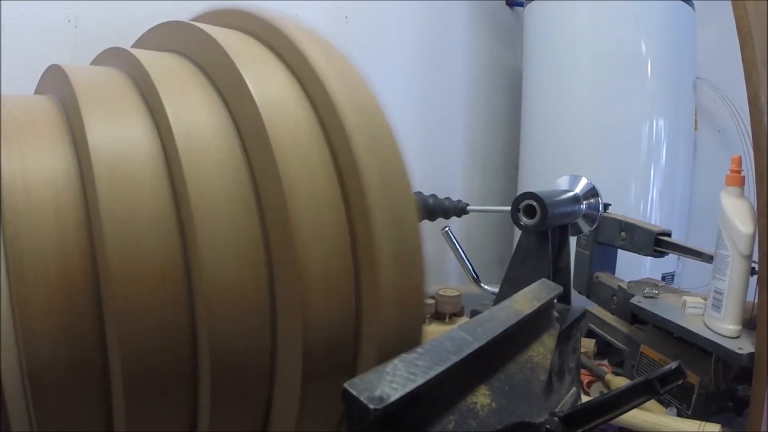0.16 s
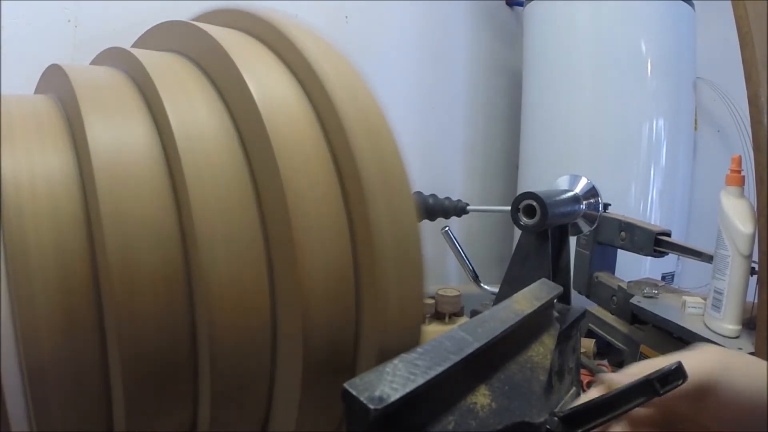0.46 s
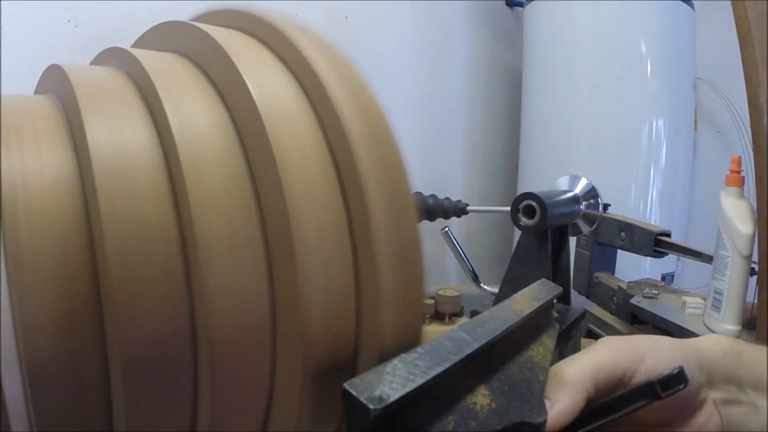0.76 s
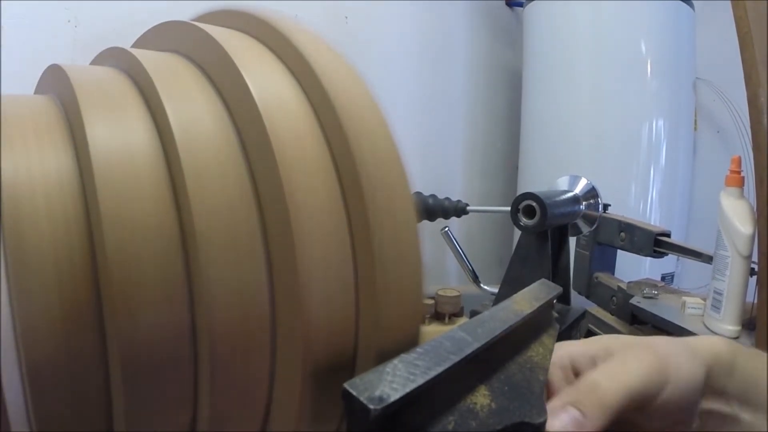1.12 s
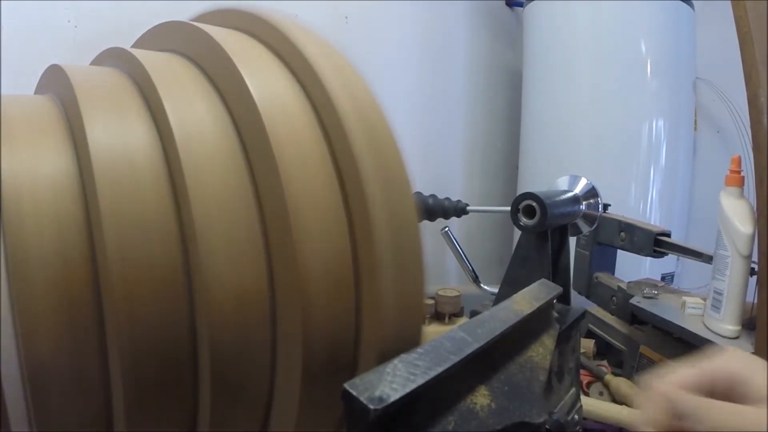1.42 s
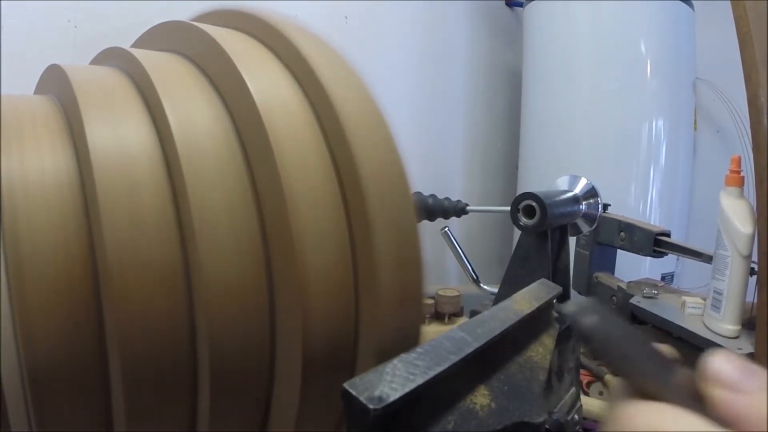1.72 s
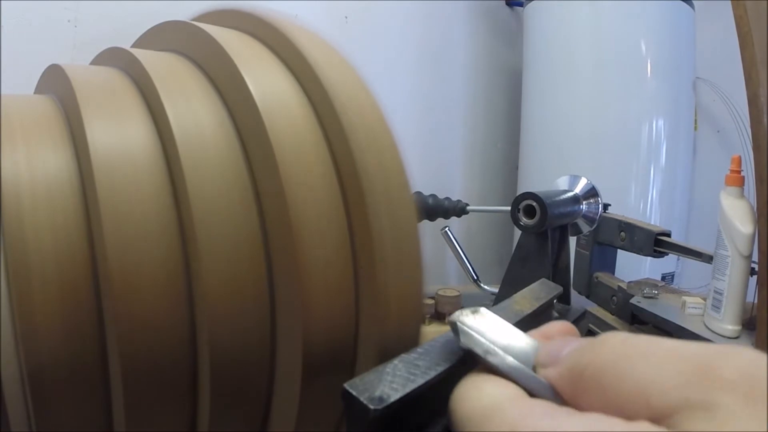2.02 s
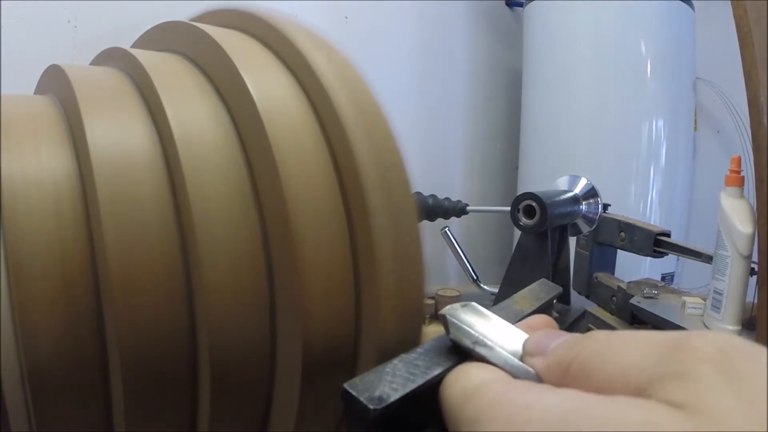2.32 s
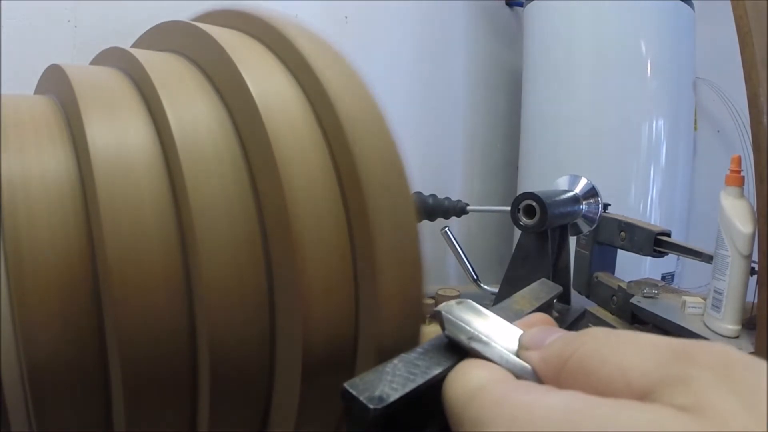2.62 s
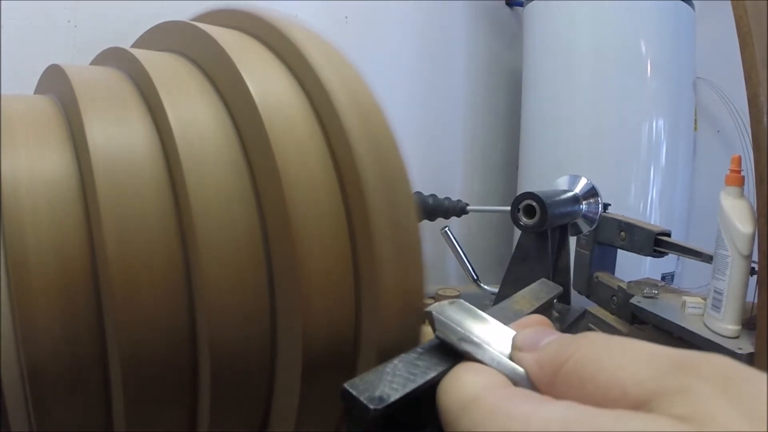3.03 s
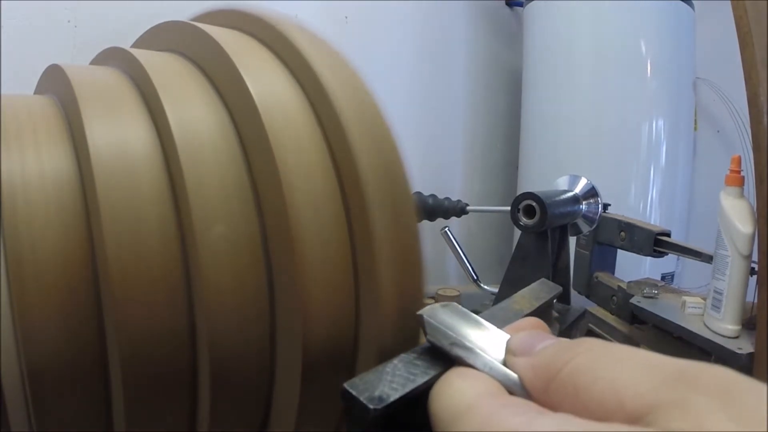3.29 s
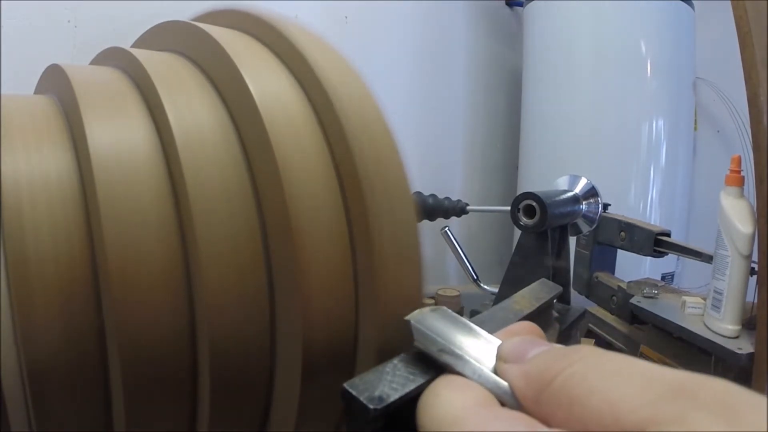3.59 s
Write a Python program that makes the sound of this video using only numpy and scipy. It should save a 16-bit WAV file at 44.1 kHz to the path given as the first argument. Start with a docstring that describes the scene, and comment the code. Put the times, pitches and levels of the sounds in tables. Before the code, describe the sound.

A wood lathe hums, steel clinks, then a gouge scrapes and chatters against spinning wood.

```python
"""A small workshop: a wood lathe growls up to speed, then hums, its belt and bearings whirring.
A steel tool is put down with a clink. A gouge taps the rest and meets the spinning blank:
first mainly its high side, once a turn, then all round. The edge scrapes nearly the same grain
every turn and chatters on its ripples, ringing gouge and rest; fibres hiss and chips snap off."""
import sys
import numpy as np
from scipy import signal
from scipy.fft import rfft, irfft
from scipy.io import wavfile

SR = 44100
rng = np.random.default_rng(int(sys.argv[2]) if len(sys.argv) > 2 else 0)


def log_audio(samples):
    """Write samples as a 16-bit WAV file to the path given in sys.argv[1]."""
    # one column per channel
    frames = np.atleast_2d(samples).T
    # limit to full scale, then quantise
    limited = np.clip(frames, -1, 1)
    pcm = np.round(limited * 32767).astype(np.int16)
    wavfile.write(sys.argv[1], SR, pcm)


N = 165375

# run-up, idle, slight sag under the cut (time [s], speed [turns/s])
MOTOR_SPEED = [(0, 18), (.1, 20.2), (.2, 23), (.3, 25.8), (.4, 28.4), (.48, 29.5), (.6, 29.73),
               (2.9, 29.73), (3.3, 29.55), (3.75, 29.45)]
# main hum, swelling and dipping (time [s], level [dB])
MOTOR_HUM = [(0, -42), (.12, -27), (.2, -23.5), (.3, -16.5), (.45, -15), (.58, -20), (.8, -15.5),
             (1.05, -15), (1.42, -20), (1.83, -15), (2.1, -17), (2.25, -20.5), (2.62, -15.5), (2.86, -17.5),
             (3.0, -16), (3.1, -27), (3.17, -16.5), (3.27, -16), (3.36, -22.5), (3.46, -14), (3.53, -13.5),
             (3.63, -28), (3.7, -17.5), (3.75, -16)]
# weaker motor vibration (multiple of turn rate [-], level [dB])
MOTOR_HARMONICS = [(3, -47), (5, -46), (6, -52.5), (7, -51.5), (8, -44), (9, -50), (10, -49.5), (20, -62.5),
                   (30, -59)]
# spindle shake (multiple of turn rate [-], idle level [dB], change under load [dB])
SPINDLE_HARMONICS = [(1, -38.5, -0.5), (2, -41, -2.5), (3, -46.5, 14), (5, -51.5, 9.5), (6, -52.5, 3)]
# mains hum, strong at the start (time [s], level [dB])
MAINS_HUM = [(0, -30), (.3, -21.5), (.42, -35.5), (3.75, -42.5)]
# starting motor (frequency [Hz], width [Hz], gain [dB])
GROWL_PEAKS = [(247, 51, 5), (584, 93, 3), (850, 72, -0.5), (1030, 130, -5.5), (1473, 140, -7.5),
               (2060, 180, -20)]
# rising whine (multiple of turn rate [-], level [dB])
WHINE_HARMONICS = [(13, -50.5), (31, -51.5), (52, -57), (78, -60.5), (102, -60.5)]
# frame resonances (frequency [Hz], width [Hz], gain [dB])
FRAME_PEAKS = [(161, 29, 1.5), (220, 28, -4), (267, 15, -3.5)]
# belt, bearings and air, upper and lower band (frequency [Hz], gain [dB])
WHIRR_SPECTRUM = [(260, -42), (440, -10.5), (467, -3), (542, -3), (611, -4), (730, -8.5), (913, -3.5),
                  (1190, -15.5), (1490, -13), (1630, -18.5), (2040, -15.5), (2270, -14.5), (3010, -17.5),
                  (3290, -18), (4500, -25.5), (6240, -28.5), (8670, -36), (11500, -36.5), (15500, -52)]
RUMBLE_SPECTRUM = [(15, -19), (40, -15.5), (70, -8), (100, 2), (135, 0), (175, -1.5), (215, -5.5),
                   (270, -9.5), (320, -16), (380, -20.5), (430, -29)]
# steady ring of the ironwork (frequency [Hz], width [Hz], gain [dB])
IRON_PEAKS = [(891, 8.3, 0.5), (2300, 30, -5.5), (3246, 20, -6), (3570, 20, -10), (4740, 23, -14.5),
              (6300, 38, -17), (7300, 60, -22.5)]
# steel put down (time [s], gain [dB])
STEEL_BLOWS = [(1.2344, -34.5), (1.3306, -3.5), (1.3765, -30)]
# its modes (frequency [Hz], gain [dB], t60 [s])
STEEL_MODES = [(1027, -23, 0.31), (1710, -32, 0.23), (3300, -15, 0.14), (3607, -18, .2), (4040, -17, 0.19),
               (4350, -13, 0.098), (4700, -5.5, .03), (4780, -10.5, 0.17), (4780, 3, 0.047),
               (6430, -18.5, .18), (6430, -17, 0.098), (14200, -19, .07)]
# its crack (frequency [Hz], gain [dB])
CRACK_SPECTRUM = [(600, -25), (1100, -8.5), (2200, -8), (3200, -3), (4800, 4.5), (5600, -11), (6500, -5.5),
                  (8200, -21.5), (11000, -17.5), (14000, -24), (15200, -33.5)]
# gouge touching the rest (time [s], gain [dB])
REST_BLOWS = [(2.2463, -46.5), (2.256, -48.5)]
# modes of that tap (frequency [Hz], gain [dB], t60 [s])
REST_MODES = [(2338, -4, 0.14), (3330, -4, 0.08), (4400, -11, 0.12), (4340, -6, .07), (6250, -11.5, .06)]
# edge on the wood (time [s], high-side force [dB], drop on the low side [dB])
CUT_FORCE = [(2.76, -60, 36), (2.772, -18, 22), (2.795, -28, 24), (2.802, -4.5, 24), (2.85, -5.5, 16.5),
             (2.92, -6.5, 16), (2.97, -5, 10), (3.03, 0.5, 10), (3.12, -1, 7.7), (3.3, -0.5, 6.2),
             (3.37, 2.5, 12.5), (3.46, -2, 7.5), (3.52, 3.5, 9.6), (3.61, 2, 10.5), (3.75, -1, 6.3)]
# gouge and rest resonances (frequency [Hz], width [Hz], gain [dB])
GOUGE_PEAKS = [(673.7, 30, -14), (1052, 55, -9), (1486, 115, -12), (2183, 83, -29.5), (2769, 76, -6.5),
               (3160, 73, -12), (3386, 190, -6.5), (3454, 70, 4.5), (3555, 72, 1), (4180, 70, -11),
               (4420, 134, -5.5), (4840, 44, -7.5), (5555, 52, -9), (5796, 84, 0.5), (6158, 95, 2.5),
               (6170, 150, -26)]
# drone of the blank, ripple harmonics 1-3 (level at full force [dB])
BLANK_DRONE_DB = [-47.5, -53.5, -50]
# tearing fibres (frequency [Hz], gain [dB])
FIBRE_SPECTRUM = [(300, -10), (600, -12.5), (1200, -13.5), (1500, -4.5), (1750, -5), (2300, -4.5),
                  (3400, 0.5), (4400, 0), (5200, -5), (6200, 3.5), (6800, -12), (7600, -12), (10000, -17),
                  (13000, -24), (15500, -36.5)]
# brief dips in the hiss (time [s], length [s], gain [dB])
HISS_DIPS = [(2.973, 0.0052, -13), (3.084, 0.02, -14), (3.187, 0.049, -52), (3.359, 0.031, -11)]
# chips snapping off (time [s], level [dB])
CHIP_SNAPS = [(2.983, -32), (3.121, -37), (3.283, -36)]
# their colour (frequency [Hz], gain [dB])
CHIP_SPECTRUM = [(3000, -4), (6000, 0), (9000, 2), (14000, -1), (15500, -10)]

MAINS_HUM_HZ, BELT_RATIO = 120, 0.968
GROWL_END_S, GROWL_FADE_S, SHUDDER_PEAK_S, SHUDDER_WIDTH_S = 0.32, 0.28, 0.34, 0.16
FIRST_BITE_S, BLANK_TURN_HZ, RIPPLES_PER_TURN, RIPPLE_DEPTH = 2.802, 28.65, 12, 0.45
BITE_TURNS, HIGH_SIDE_TURNS, RELEASE_TURNS = 0.022, 0.28, 0.29
GRAIN_MEMORY, GRAIN_SPREAD_DB, HAND_WAVER_DB = 0.6, 6.5, 0.5
ROOM_DELAY_S, ROOM_T60_S, ROOM_DB = 0.0048, 0.067, -22.5
TOP_HZ = 15450


def undb(db):
    """Decibels to gain."""
    return 10 ** (np.asarray(db) / 20)


def level(x, db):
    """Scale to an rms level."""
    return x * undb(db) / np.sqrt(np.mean(x ** 2))


def curve(table, t, column=1):
    """Linear interpolation of a table column."""
    rows = np.array(table)
    return np.interp(t, rows[:, 0], rows[:, column])


def noise():
    """White noise."""
    return rng.standard_normal(N)


def lowpass(x, hz, order=2, **padding):
    """Zero-phase low-pass."""
    return signal.sosfiltfilt(signal.butter(order, hz, fs=SR, output="sos"), x, **padding)


def waver():
    """Slow random drift, unit rms."""
    return level(lowpass(rng.standard_normal(N + SR), hz=8)[SR // 2:][:N], 0)


def tone(angle_rad, db):
    """Sine at an rms level, random phase."""
    return np.sqrt(2) * undb(db) * np.sin(angle_rad + rng.uniform(0, 2 * np.pi))


def colour(x, points):
    """Minimum-phase filter through (Hz, dB) points, steep outside them."""
    octave, rows = np.log2(np.arange(4097) * SR / 8192 + 1), np.array(points)
    knots = np.log2(rows[:, 0])
    skirt_db = np.minimum(40 * abs(octave - np.clip(octave, knots[0], knots[-1])), 70)
    cepstrum = irfft(np.log(undb(np.interp(octave, knots, rows[:, 1]) - skirt_db)))
    cepstrum[1:4096] *= 2
    cepstrum[4097:] = 0
    return signal.fftconvolve(x, irfft(np.exp(rfft(cepstrum))))[:N]


def resonate(x, peaks):
    """Resonator bank, each applied twice for steep sides."""
    return sum(undb(db) * signal.sosfilt([np.concatenate(signal.iirpeak(hz, hz / width, fs=SR))] * 2, x)
               for hz, width, db in peaks)


def fade(t, start_s, t60_s):
    """Sudden onset, exponential decay."""
    return (t >= start_s) * np.exp(-np.log(1000) * np.clip((t - start_s) / t60_s, 0, 10))


def strike(t, blows, modes):
    """Each blow rings the damped modes."""
    out, age = np.zeros(N), t[:SR // 2]
    ring = sum(undb(db) * fade(age, 0, t60) * np.sin(2 * np.pi * hz * age) for hz, db, t60 in modes)
    for start_s, db in blows:
        i = int(start_s * SR)
        out[i:i + len(age)] += undb(db) * ring
    return out


def hum(t, pace, load, motor_rad, spindle_rad, mains_rad):
    """Motor and spindle vibrate at multiples of their turn rates, over mains hum."""
    main = tone(4 * motor_rad, curve(MOTOR_HUM, t)) + tone(mains_rad, curve(MAINS_HUM, t))
    motor = sum(tone(k * motor_rad + 0.44 * waver(), db + 2.4 * waver()) for k, db in MOTOR_HARMONICS)
    spindle = sum(tone(k * spindle_rad, db + load * cut_db) for k, db, cut_db in SPINDLE_HARMONICS)
    return main + pace ** 6 * motor + pace ** 14 * spindle


def run_up(t, motor_rad, mains_rad):
    """The starting motor growls and whines; the frame shudders as speed comes up."""
    starting = np.clip((GROWL_END_S - t) / GROWL_FADE_S, 0, 1) ** 0.5
    growl = level(resonate(noise() * (1 + 0.39 * np.cos(mains_rad)), GROWL_PEAKS), db=-43)
    smear = lambda: level(lowpass(noise(), hz=24, padtype="even", padlen=SR // 2), 0)
    whine = sum(smear() * tone(k * motor_rad, db) for k, db in WHINE_HARMONICS)
    swell = np.exp(-((t - SHUDDER_PEAK_S) / SHUDDER_WIDTH_S) ** 2)
    shudder = swell * level(resonate(noise(), FRAME_PEAKS), db=-33.5)
    return starting * (growl + whine) + shudder


def whirr(pace, load, spindle_rad, mains_rad):
    """Belt, bearing and air noise with faint iron ring; the rumble grows under load."""
    rush = level(colour(noise(), WHIRR_SPECTRUM), db=-50)
    rush += level(resonate(noise(), IRON_PEAKS), db=-63)
    bearings = lowpass(rush, hz=2700, order=4)
    air = rush - bearings
    throb = 1 + 0.1 * np.cos(spindle_rad) + 0.077 * np.cos(mains_rad)
    rumble = (1 + 0.36 * load) * level(colour(noise(), RUMBLE_SPECTRUM), db=-36)
    return pace * (throb * bearings + air) + pace ** 2 * rumble


def lathe(t):
    """The motor turns the spindle through a belt."""
    speed_hz = curve(MOTOR_SPEED, t)
    pace = speed_hz / speed_hz.max()
    load = np.minimum(undb(curve(CUT_FORCE, t)), 1)
    motor_rad = 2 * np.pi * np.cumsum(speed_hz) / SR
    spindle_rad, mains_rad = BELT_RATIO * motor_rad, 2 * np.pi * MAINS_HUM_HZ * t
    return (hum(t, pace, load, motor_rad, spindle_rad, mains_rad) + run_up(t, motor_rad, mains_rad)
            + whirr(pace, load, spindle_rad, mains_rad))


def steel_clink(t):
    """Steel lands with a crack and a short ring."""
    burst = sum(undb(db - 23.5) * fade(t, s, t60_s=0.044) + undb(db - 35.5) * fade(t, s, t60_s=0.24)
                for s, db in STEEL_BLOWS)
    crack = burst * level(colour(noise(), CRACK_SPECTRUM), 0)
    return crack + undb(-23) * strike(t, STEEL_BLOWS, STEEL_MODES)


def rest_tap(t):
    """The gouge touches the rest; the metal rings faintly."""
    return strike(t, REST_BLOWS, REST_MODES)


def grain():
    """Uneven fibres pass the edge; each turn keeps much of the last turn's pattern."""
    turn_samples = int(SR / BLANK_TURN_HZ)
    shape = (N // turn_samples + 1, turn_samples)

    def surface():
        rows = signal.lfilter([1], [1, -GRAIN_MEMORY], rng.standard_normal(shape), axis=0)
        return level(rows.ravel()[:N], 0)

    return surface() * undb(GRAIN_SPREAD_DB * surface())


def gouge_ring(force, push, db):
    """Gouge and rest resonate to a push; db holds at unit force."""
    return resonate(force * push, GOUGE_PEAKS) * undb(db) / np.std(resonate(push, GOUGE_PEAKS))


def fibre_hiss(t, pressure, contact, scrape):
    """Tearing fibres hiss with the force on the edge; the level dips briefly."""
    dips_db = sum(db * np.exp(-(2 * (t - s) / length_s) ** 8) for s, length_s, db in HISS_DIPS)
    hiss = level(colour(scrape, FIBRE_SPECTRUM), db=-27.5)
    return undb(dips_db) * pressure ** 1.065 * contact ** 0.65 * hiss


def gouge_cut(t):
    """The edge bites hardest on the high side and knocks on every ripple; the blank drones."""
    turns = (t - FIRST_BITE_S) * BLANK_TURN_HZ
    turn_phase, ripple_phase = turns % 1, turns * RIPPLES_PER_TURN % 1
    bite = np.clip(1 - (1 - turn_phase) / BITE_TURNS, 0, 1)
    release = np.clip(1 - (turn_phase - HIGH_SIDE_TURNS) / RELEASE_TURNS, 0, 1)
    drop_db = curve(CUT_FORCE, t, column=2) * (1 - np.maximum(bite, release))
    contact = (t > CUT_FORCE[0][0]) * undb(HAND_WAVER_DB * waver() - drop_db)
    pressure = undb(curve(CUT_FORCE, t))
    force = pressure * contact
    scrape = grain() * (1 + RIPPLE_DEPTH * np.cos(2 * np.pi * ripple_phase))
    offset_samples = ((ripple_phase + 0.5) % 1 - 0.5) * SR / (BLANK_TURN_HZ * RIPPLES_PER_TURN)
    knocks = np.exp(-offset_samples ** 2 / 2)
    ring = gouge_ring(force, scrape, db=-24) + gouge_ring(force, knocks, db=-35)
    drone = sum(np.sqrt(2) * undb(db) * np.sin(2 * np.pi * k * ripple_phase)
                for k, db in enumerate(BLANK_DRONE_DB, 1))
    return ring + np.minimum(pressure, 1) * drone + fibre_hiss(t, pressure, contact, scrape)


def chips(t):
    """Chips snap off in bright noise bursts."""
    bursts = sum(undb(db) * fade(t, s, t60_s=0.031) for s, db in CHIP_SNAPS)
    return bursts * level(colour(noise(), CHIP_SPECTRUM), 0)


def scene():
    """Lathe plus tools; short workshop echo on the tools only."""
    t = np.arange(N) / SR
    tools = steel_clink(t) + rest_tap(t) + gouge_cut(t) + chips(t)
    walls = (noise() * fade(t, ROOM_DELAY_S, ROOM_T60_S))[:SR // 2]
    echo = signal.fftconvolve(tools, walls / np.linalg.norm(walls))[:N]
    return (lathe(t) + tools + undb(ROOM_DB) * echo)[None]


def record(dry):
    """Steep low-pass on the top treble."""
    return signal.sosfilt(signal.ellip(10, 0.2, 80, TOP_HZ, fs=SR, output="sos"), dry)


dry = scene()
out = record(dry)
log_audio(out)
```